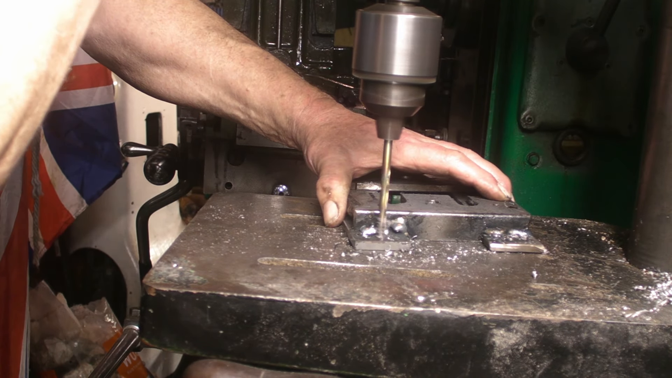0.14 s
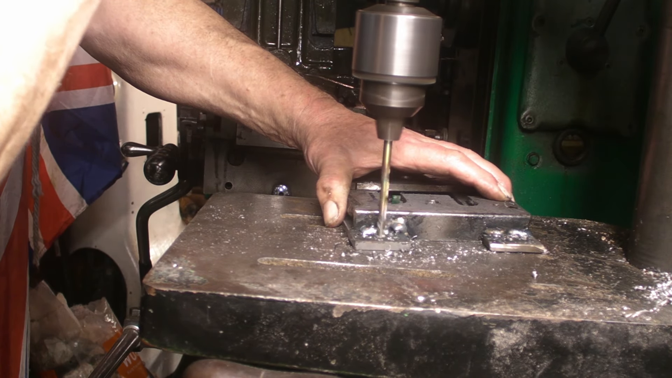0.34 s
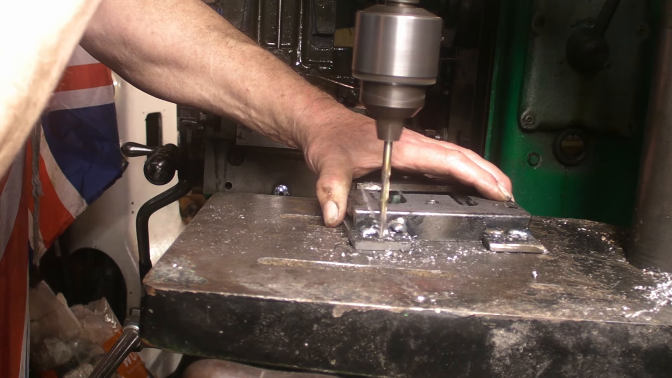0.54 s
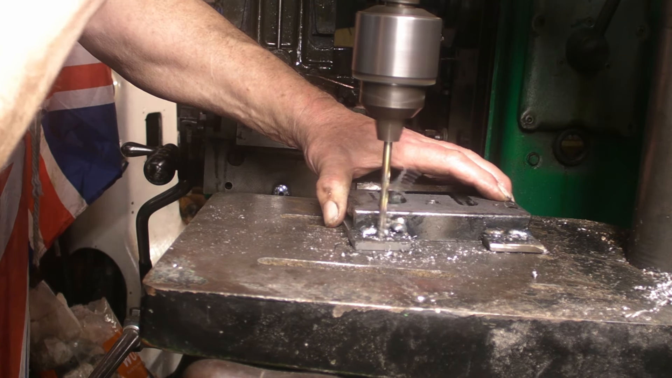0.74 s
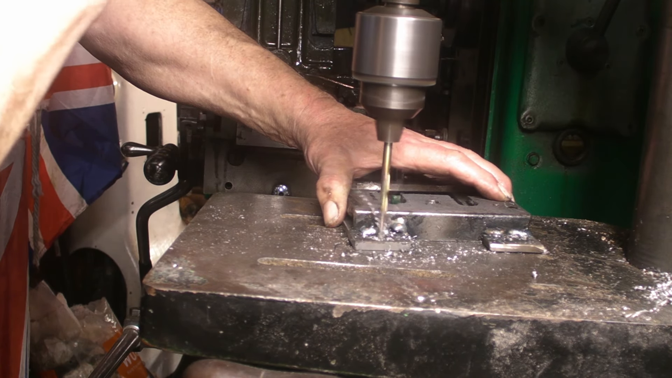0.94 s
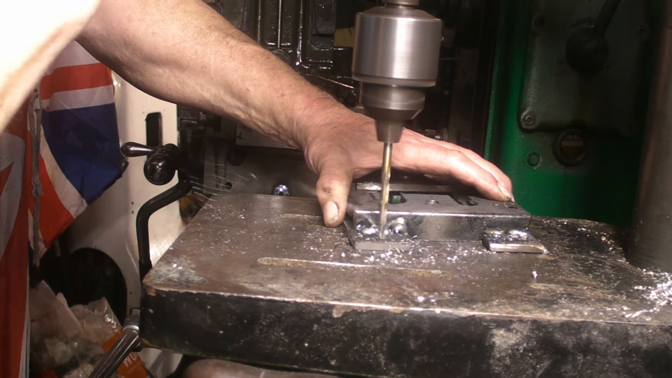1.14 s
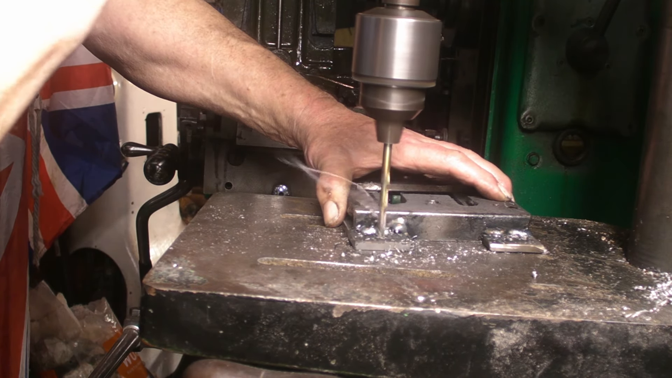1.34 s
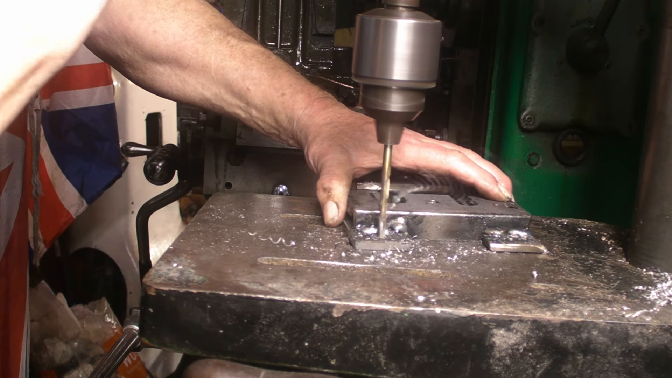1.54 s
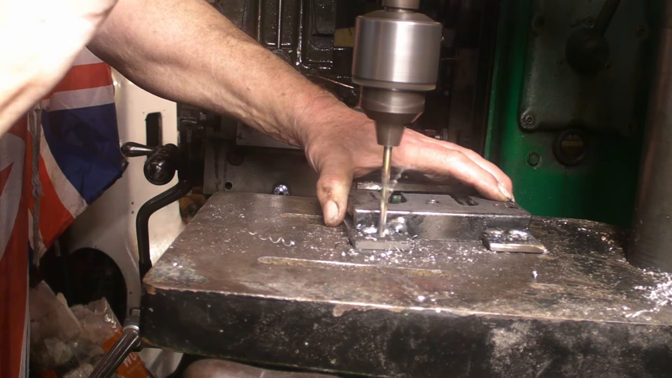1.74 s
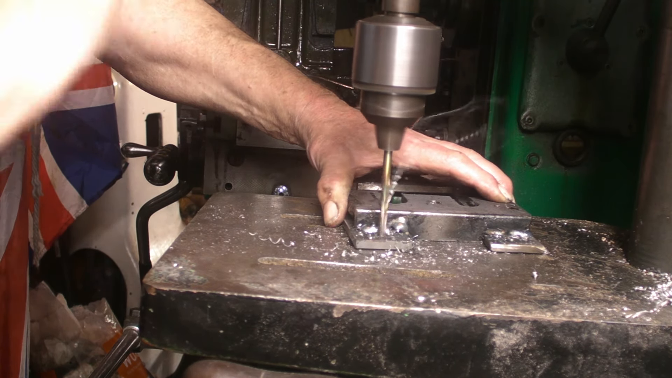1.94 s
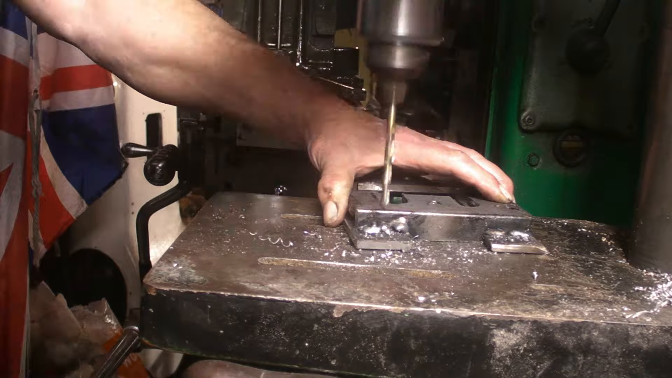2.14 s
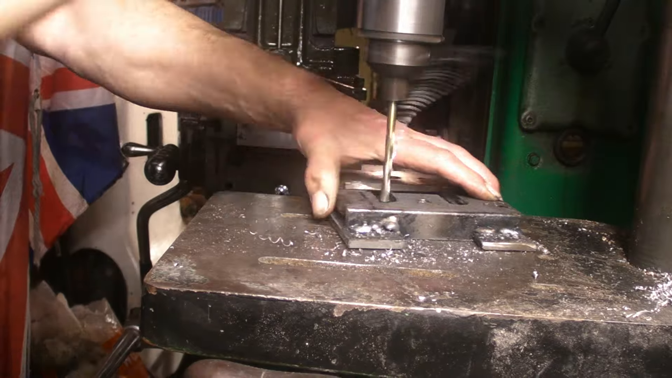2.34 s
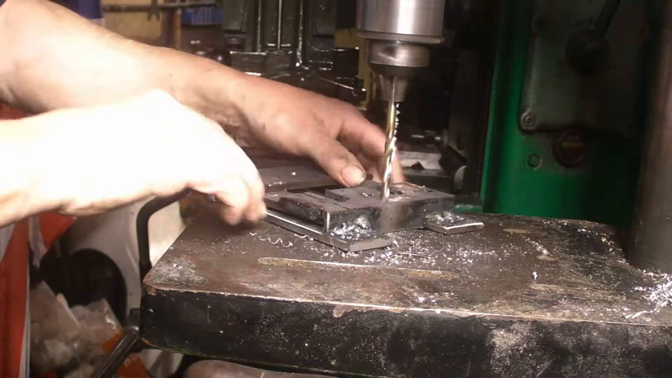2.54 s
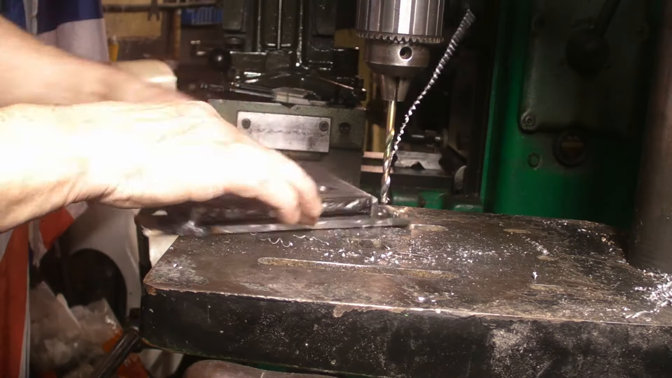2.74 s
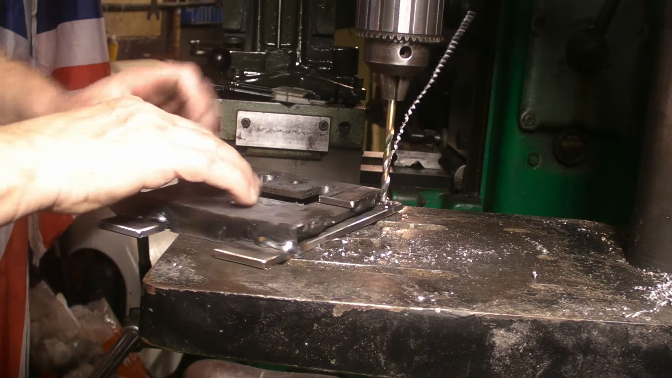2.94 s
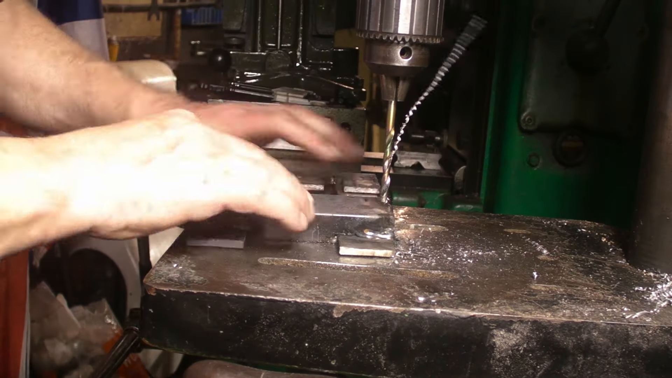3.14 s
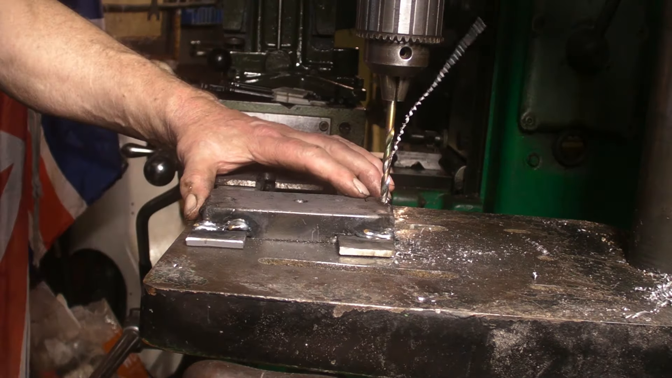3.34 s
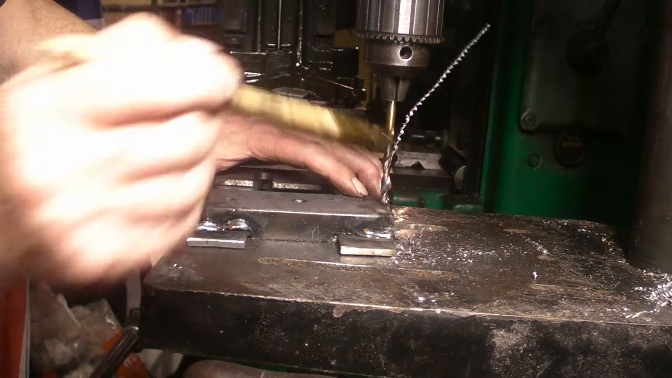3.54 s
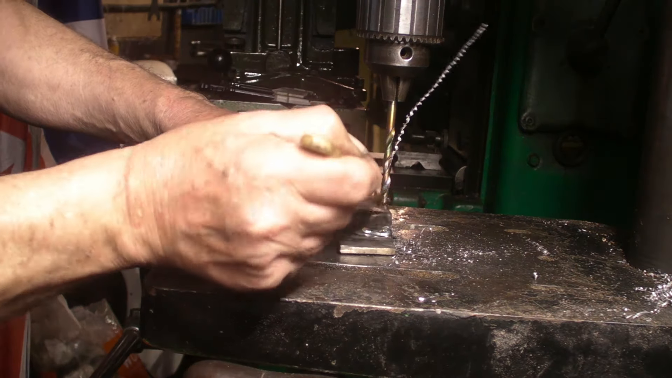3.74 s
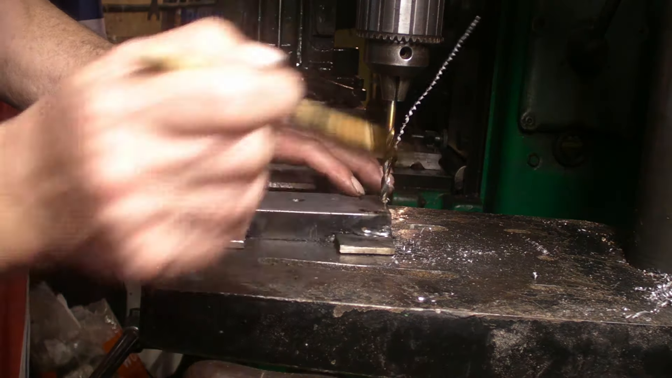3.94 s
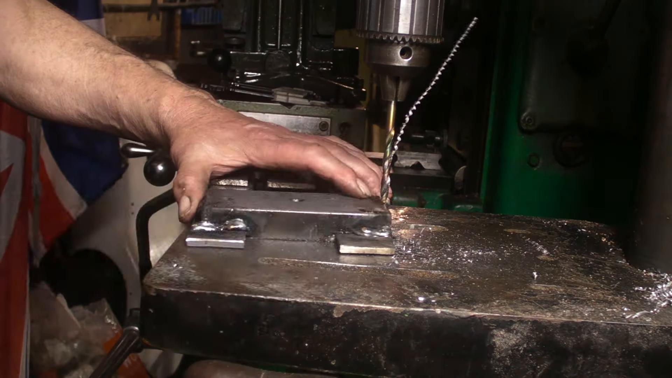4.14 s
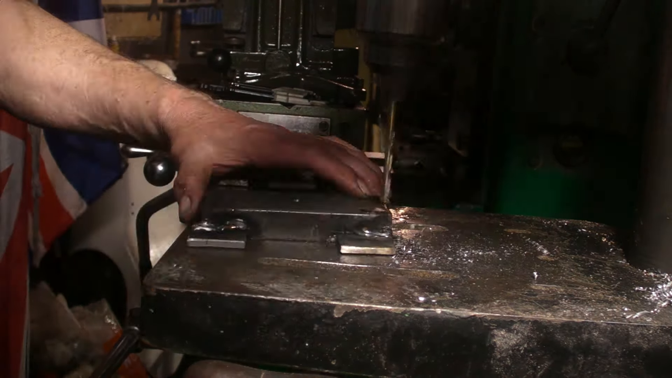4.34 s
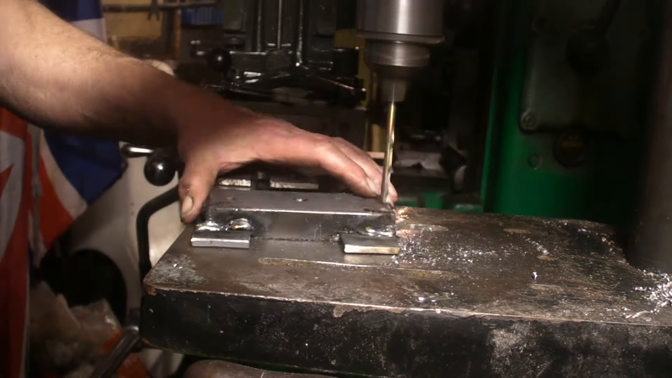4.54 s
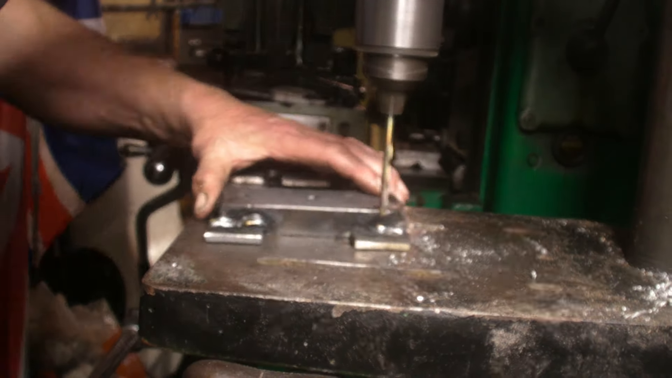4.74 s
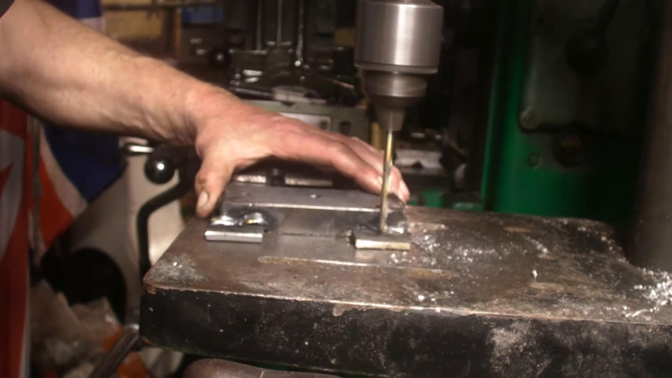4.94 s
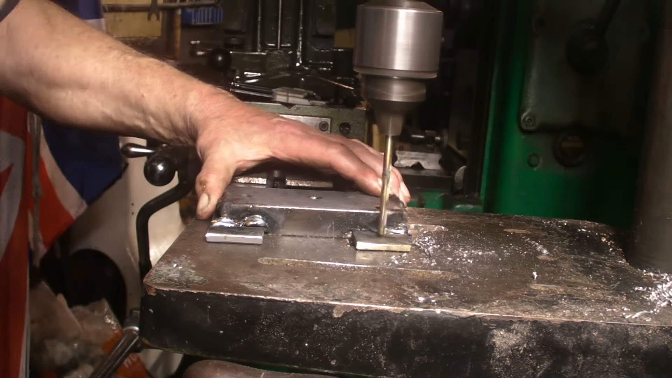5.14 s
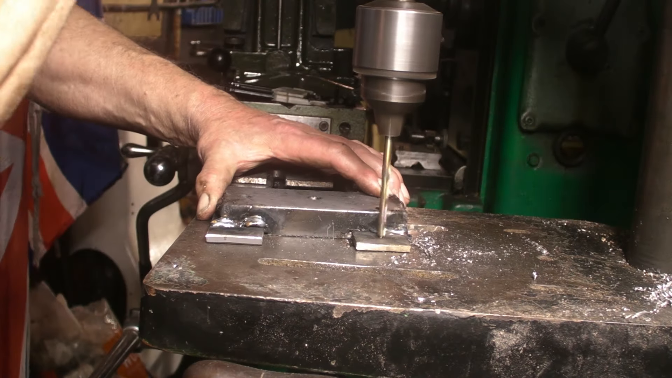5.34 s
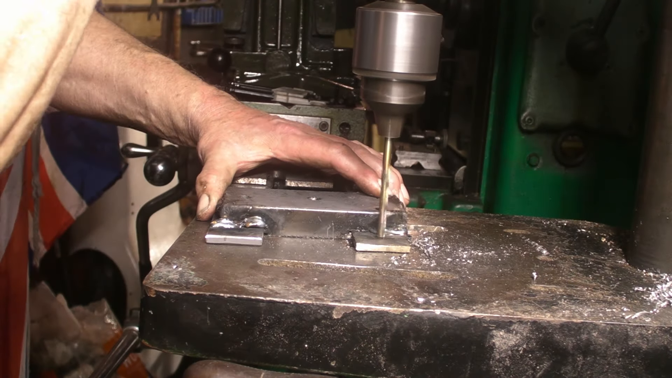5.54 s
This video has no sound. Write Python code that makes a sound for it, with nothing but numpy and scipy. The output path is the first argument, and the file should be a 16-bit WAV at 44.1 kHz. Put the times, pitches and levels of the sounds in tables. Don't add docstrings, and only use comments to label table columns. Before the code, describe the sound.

Close in a small workshop, a pillar drill runs with a bright metallic sizzle, low rumble and coarse steel grinding, its level fluttering. After about two seconds it cuts off. Hands slide and knock a steel plate on the iron table, brushing swarf, then small faint ticks. A sharp switch click, and the motor abruptly resumes its hissing whir. A small camera microphone hears it in stereo, dry, with the treble ending steeply.

```python
import sys
import numpy as np
from scipy import signal
from scipy.fft import rfft, irfft, next_fast_len
from scipy.io import wavfile

SR = 44100
rng = np.random.default_rng(int(sys.argv[2]) if len(sys.argv) > 2 else 0)


def bounce(signal):
    frames = np.transpose(np.atleast_2d(signal))
    limited = np.clip(frames, -1, 1)
    pcm = np.round(limited * 32767).astype(np.int16)
    wavfile.write(sys.argv[1], SR, pcm)


def volts_from_decibels(level):
    exponent = np.asarray(level, float) / 20
    return 10 ** exponent


N = 250488
FFT_SIZE = next_fast_len(N, True)
HZ = np.fft.rfftfreq(FFT_SIZE, 1 / SR) + 1e-3
T = np.arange(N) / SR
PIECE_S = 0.017
STOP_S, START_S = 2.272, 4.378

# frequency in Hz, density in dB per Hz.
SHOP_SPECTRUM = [(18, -37), (30, -3.5), (92, -5), (202, -5), (575, -13), (1360, -18.5), (10700, -21.5),
                 (12600, -22.5), (15500, -28)]
# frequency in Hz, correlation from 0 to 1.
PORT_LIKENESS = [(60, 0.83), (130, 0.89), (290, 0.77), (640, 0.63), (1410, 0.19), (3100, 0.027),
                 (6820, 0.007), (15000, 0.23)]
# frequency in Hz, level difference in dB.
PORT_BALANCE = [(60, -7), (110, 9.5), (200, 3), (380, 3.0), (700, 2.5), (1290, 2.5), (2380, 1.5),
                (4400, 2.5), (8120, 0.5), (15000, -5)]
# frequency in Hz, phase in radians.
PORT_LEAD = [(0, 0), (1030, -0.7), (1550, -0.5), (1980, -1.1), (2670, 0.8), (2930, -1.4), (5080, -4.8),
             (6890, -4.7), (7320, -9.3), (9560, -24.9), (10400, -32.2), (12200, -26.5), (12700, -24.3),
             (15200, -5.5)]

# middle in seconds, length in ms, then plate, thud, scrape
# and swarf levels in dB.
HAND_MOVES = [(2.342, 340, -33.5, -42.0, -42.5, -38), (2.39, 62, -45, -49, -36.0, -29.5),
              (2.416, 56, -36.0, -44, -39, -29.5), (2.444, 48, -26.0, -33.0, -27.0, -26.5),
              (2.53, 116, -34, -43.5, -38.5, -36), (2.645, 67, -27, -50, -41, -40),
              (2.68, 140, -37.5, -46, -46, -43.5), (2.738, 110, -38, -45, -43, -42.0),
              (2.763, 110, -33, -45, -51, -45), (2.795, 36, -28.5, -48.0, -31.5, -32.5),
              (2.826, 66, -35, -43, -60, -48), (2.85, 34, -42, -55, -60, -66),
              (2.882, 90, -36, -40, -48.5, -47), (2.955, 89, -24, -37, -40, -38.5),
              (3.045, 110, -27.5, -46, -42.5, -39.5), (3.151, 92, -25, -38, -36.5, -33.0),
              (3.269, 70, -61, -62, -59, -50.5), (3.482, 39, -49.0, -42, -56, -49),
              (3.54, 59, -62.0, -69, -66, -56), (3.608, 89, -44.5, -69, -53.0, -51.5),
              (3.667, 44, -47, -49, -57, -56.0), (3.687, 34, -47, -62.0, -63.0, -55.0),
              (3.739, 45, -41, -50, -48.5, -47), (3.798, 23, -50, -68, -58, -60.0),
              (3.839, 76, -54, -65, -62.0, -61.0), (3.896, 34, -53.5, -67, -61.0, -58.0),
              (3.956, 28, -46.5, -54, -49.0, -47), (4.136, 98, -62, -62.0, -61, -56),
              (4.317, 60, -56, -60.0, -65, -57)]
# middle in seconds, length in
# ms, then plate, thud, scrape and swarf levels in dB.
MORE_HAND_MOVES = [(2.053, 30, -21.5, -44, -32.5, -42), (2.191, 37, -25, -28.5, -30.5, -60),
                   (2.262, 24, -35, -35, -26, -40), (2.29, 74, -34, -40, -37.5, -34),
                   (2.497, 15, -42, -52, -32, -21.5), (3.424, 34, -57, -48, -62, -47),
                   (4.345, 28, -48, -58, -38, -43), (2.432, 19, -36, -25, -40, -43), (2.365, 24, -35, -45, -35, -34),
                   (2.477, 78, -32, -34.5, -41, -37), (2.589, 46, -49, -56, -46, -35.5),
                   (2.616, 57, -33, -50, -54, -45), (3.161, 9.6, -16.5, -50, -43, -46),
                   (3.205, 96, -66, -59, -72, -63), (3.41, 95, -71, -69, -70, -55), (3.585, 34, -54, -71, -60, -56),
                   (3.765, 36, -47, -47, -63, -53), (4.01, 92, -75, -74, -76, -60.5),
                   (4.388, 36.6, -27.5, -38, -31, -28), (4.46, 110, -51, -43, -39, -32)]
# frequency in Hz, width in Hz, level in dB.
LOOSE_PLATE_MODES = [(567, 66, 1.5), (683, 200, -7), (910, 100, -9.5), (1177, 51, -3), (1350, 78, -2.5),
                     (1499, 87, -8), (1745, 140, -9.5), (2195, 60, -7.5)]
# frequency in Hz, density in dB per Hz.
THUD_SPECTRUM = [(40, -19), (90, -6), (165, -4), (265, 0), (380, -3), (470, -3), (600, -25.5)]
# frequency in Hz, density in dB per Hz.
SCRAPE_SPECTRUM = [(1500, -25), (2300, -9), (3300, -0.5), (4000, 0), (4900, 2.5), (5800, -7), (7000, -60)]
# frequency in Hz, density in dB per Hz.
SWARF_SPECTRUM = [(4500, -17), (5800, -0.5), (7000, -2), (8300, -0.5), (9700, 0.5), (10500, -10.5),
                  (11500, -9), (15300, -26)]

# middle in seconds, length in ms, frequency in Hz, level in dB.
PINGS = [(1.76, 50, 1590, -30.5), (2.052, 49, 1550, -30), (2.19, 26, 1220, -22.5), (2.264, 34, 1460, -16),
         (2.264, 29, 4070, -27), (2.305, 80, 1213, -35), (2.335, 140, 1680, -38), (2.365, 30, 8140, -26),
         (2.39, 40, 2720, -34), (2.405, 60, 1640, -35), (2.415, 30, 4900, -37), (2.445, 22, 7250, -28),
         (2.448, 38, 2680, -29), (2.448, 33, 4800, -34), (2.452, 23, 1550, -23), (2.515, 76, 3400, -37),
         (2.527, 26, 8100, -38), (2.53, 60, 1160, -37), (2.642, 37, 877, -28.5), (2.745, 62, 1347, -36),
         (2.826, 31, 582, -33), (2.85, 33, 576, -32), (2.955, 79, 1387, -28.5), (3.04, 52, 1400, -28.5),
         (3.035, 50, 1676, -30), (3.16, 31, 578, -27), (3.62, 53, 1316, -54), (3.74, 42, 1174, -45),
         (3.05, 77, 659, -31), (3.23, 120, 716, -61), (3.7, 180, 645, -60), (3.798, 26, 640, -45),
         (4.386, 21, 1180, -22), (4.389, 17, 794, -22), (4.522, 84, 1460, -24), (4.564, 19, 1468, -21),
         (4.735, 30, 595, -22), (4.755, 50, 1487, -27), (5.6, 93, 1193, -29)]
# start in seconds, blow in dB, tilt in dB per octave, rattle in dB, rattle length in ms.
CLICKS = [
    (2.4973, -19.5, 5, -30, 9),
    (2.732, -36, -1, -44, 10),
    (3.4245, -40, -5.5, -48, 8.9),
    (3.478, -48, 6, -62, 18),
    (3.723, -49, 3, -48, 16),
    (4.1785, -23.5, 0.7, -27, 18.3),
    (4.339, -46, 5, -44, 51),
]
# frequency in Hz, decay by 60 dB in seconds, level in dB.
SWITCH_MODES = [(533, .03, 0), (800, .01, -5), (1230, .012, -4), (1650, .006, -5), (2160, .006, -1),
                (3080, .005, -4), (4410, .005, -3), (5870, .004, -6), (7300, .004, -7), (8500, .005, -7),
                (9660, .007, -5)]

# time in seconds, then bearing sizzle, casing rumble and cutting levels in dB.
MOTOR_RUNS = [
    [(0.0, -19, -31, -30), (0.18, -23, -33.5, -29), (1.03, -22, -31, -29.5), (1.29, -24, -34, -29),
     (1.47, -22, -27.5, -30), (1.54, -22, -34.5, -28.5), (1.59, -20.5, -29.5, -33),
     (1.64, -24, -34.5, -30.5), (1.9, -20, -31, -34.5), (1.95, -21.5, -40, -31), (1.97, -19, -29.5, -37),
     (2.04, -23.5, -32.5, -35), (2.15, -20.5, -29.5, -35.5), (2.2, -23.5, -37, -31.5),
     (2.22, -18.5, -29, -36.5), (2.26, -23.5, -32, -36), (2.27, -33, -38, -30)],
    [(4.385, -37, -33, -38.5), (4.391, -20, -29, -30), (4.413, -22.5, -33, -49), (4.481, -19, -34.5, -37),
     (4.499, -19.5, -37, -31.5), (4.517, -21, -31.5, -36.5), (4.727, -21, -28.5, -35),
     (4.787, -20, -31.5, -42), (4.881, -20.5, -32, -35.5), (5.509, -20.5, -29.5, -37.5),
     (5.68, -22.5, -33, -32)],
]
# frequency in Hz, level in dB.
HUM_TONES = [(145, -37.5), (295, -41), (404, -37), (700, -32.5), (1800, -42.5), (7170, -38), (9540, -39)]
# frequency in Hz, width in Hz, level in dB.
SPINDLE_MODES = [(6240, 40, -9), (6890, 50, -3), (6975, 40, -5), (7170, 50, -2), (7310, 45, -6),
                 (7490, 60, -4), (8180, 70, -10), (9065, 50, -6), (9550, 100, -1), (9700, 60, -5),
                 (10000, 60, -3), (10355, 90, -2), (12100, 150, -16), (13620, 250, -18), (14550, 200, -22)]
# frequency in Hz, density in dB per Hz.
SIZZLE_SPECTRUM = [(1500, -36), (2500, -19), (3700, -20), (4900, -16), (5900, -14), (7000, -9), (9000, -9),
                   (10400, -9), (11000, -19), (12350, -25), (12600, -44), (12900, -42), (13500, -29),
                   (15000, -33), (15250, -60)]
# frequency in Hz, density in dB per Hz.
CASING_SPECTRUM = [(20, -45), (60, -13.5), (140, -2.5), (220, -4), (330, -6), (420, -5), (700, -4.5),
                   (1000, -6.5), (1500, -4.5), (1900, -8), (2300, -35.5), (4000, -31.5)]
# frequency in Hz, width in Hz, level in dB.
CUT_PLATE_MODES = [(560, 65, 0), (620, 50, -5), (800, 50, -7), (900, 60, -7), (1100, 70, -8),
                   (1362, 50, -4), (1565, 45, -5), (1990, 110, -6), (2070, 60, -7), (2300, 90, -10),
                   (2685, 60, -5), (2838, 50, -3.5), (4800, 90, -13), (5100, 160, -15)]
# frequency in Hz, density in dB per Hz.
GRIND_SPECTRUM = [(250, -36), (450, -10.5), (1000, -8.5), (2000, -13), (3000, -12.5), (3900, -15.5),
                  (5000, -12), (6200, -18)]


def curve(table):
    hz, value = np.transpose(table)
    return np.interp(np.log(HZ), np.log(hz), value)


def colour(table):
    octaves_below = np.maximum(np.log2(table[0][0] / HZ), 0)
    octaves_above = np.maximum(np.log2(HZ / table[-1][0]), 0)
    return volts_from_decibels(curve(table) - 30 * (octaves_below + octaves_above))


def modes(table):
    return np.sqrt(sum(volts_from_decibels(2 * db) / (1 + (2 * (HZ - hz) / width) ** 2) ** 2 for hz, width, db in table))


def band(lo_hz, hi_hz):
    return 1 / np.sqrt((1 + (lo_hz / HZ) ** 6) * (1 + (HZ / hi_hz) ** 6))


def pieces(values, t):
    return np.interp(t, np.arange(len(values)) * PIECE_S, values)


def heard(gain, grit_db=0.0, piece_db=0.0, alike=1.05, lean=1.0):
    grit = volts_from_decibels(grit_db * np.repeat(rng.standard_normal(N // 32 + 1), 32)[:N])
    mid, side = rfft(grit * rng.standard_normal((2, N)), FFT_SIZE) * gain
    likeness = np.clip(alike * np.maximum(curve(PORT_LIKENESS), 0.38), 0, 0.99)
    shared, private = np.sqrt(1 + likeness) * mid, np.sqrt(1 - likeness) * side
    left, right = shared + private, shared - private
    left = left * np.exp(0.8j * np.interp(HZ, *np.transpose(PORT_LEAD)))
    tip = volts_from_decibels(lean * curve(PORT_BALANCE) / 2)
    out = irfft(np.array([left * tip, right / tip]), FFT_SIZE)[:, :N]
    out = out / np.std(out.mean(axis=0))
    return out * volts_from_decibels(piece_db * pieces(rng.standard_normal(1000), T))


def tone(hz, t, slip=np.pi):
    common = np.cumsum(rng.uniform(-slip, slip, 400))
    phases = common + min(hz / 3000, 1.2) * rng.standard_normal((2, 400))
    wave = 2 * np.pi * hz * t
    ports = [pieces(np.cos(phase), t) * np.cos(wave) + pieces(np.sin(phase), t) * np.sin(wave)
             for phase in phases]
    return 1.68 * np.array(ports)


def bump(middle_s, ms):
    half_s = ms / 2000
    at = slice(int((middle_s - half_s) * SR), min(int((middle_s + half_s) * SR), N))
    return at, np.cos(np.pi * (T[at] - middle_s) * 1000 / ms) ** 2


def quiet_shop():
    return volts_from_decibels(-57.5) * heard(colour(SHOP_SPECTRUM), alike=0.3) + volts_from_decibels(-77) * tone(15714, T)


def hands():
    plate_gain = np.hypot(modes(LOOSE_PLATE_MODES), volts_from_decibels(-14) * band(350, 2100))
    bodies = [heard(plate_gain, grit_db=5.0, alike=1.2, lean=0.4),
              heard(colour(THUD_SPECTRUM), lean=0.5),
              heard(colour(SCRAPE_SPECTRUM), grit_db=2.0, lean=0.71),
              heard(colour(SWARF_SPECTRUM), grit_db=2.0, piece_db=3.5)]
    power = np.zeros((4, N))
    for middle_s, ms, *levels_db in list(HAND_MOVES) + list(MORE_HAND_MOVES):
        at, shape = bump(middle_s, ms)
        power[:, at] += volts_from_decibels(2 * np.array(levels_db))[:, None] * shape ** 2
    return sum(body * np.sqrt(p) for body, p in zip(bodies, power))


def pings():
    out = np.zeros((2, N))
    for middle_s, ms, hz, db in PINGS:
        at, shape = bump(middle_s, ms)
        out[:, at] += volts_from_decibels(db - 4.0) * shape * tone(hz, T[at], slip=1.28)
    return out


def clicks():
    out, t = np.zeros((2, N)), T[:1600]
    hz, t60, mode_db = np.transpose(SWITCH_MODES)[:, :, None]
    for start_s, blow_db, tilt_db, rattle_db, ms in CLICKS:
        strength = volts_from_decibels(mode_db + tilt_db * np.log2(hz / 2000))
        decay = np.exp(-np.log(1000) * t / t60)
        rings = strength * decay * np.sin(2 * np.pi * (hz * t + rng.random(hz.shape)))
        body = rings.sum(axis=0)
        body = body / np.abs(body).max()
        fade = np.clip(1 - 1000 * t / ms, 0, 1) ** 2
        echoes = volts_from_decibels(rattle_db) * 0.5 * rng.standard_normal((2, len(t))) * fade
        echoes[0, 4] += volts_from_decibels(blow_db + 12)
        echoes[1, 4] += 0
        echoes[1, 0] += volts_from_decibels(blow_db + 5)
        chop = np.clip(3 - 2500 * t / ms, 0, 1)
        i = int(start_s * SR)
        out[:, i:i + len(t)] += signal.fftconvolve(echoes, body[None])[:, :len(t)] * chop
    return out


def bearings():
    return heard(np.hypot(colour(SIZZLE_SPECTRUM), modes(SPINDLE_MODES)), grit_db=1.0, piece_db=0.6)


def casing():
    return heard(colour(CASING_SPECTRUM), piece_db=2.24)


def bit():
    return heard(np.hypot(colour(GRIND_SPECTRUM), modes(CUT_PLATE_MODES)), grit_db=2.5, piece_db=0.8)


def motor_hum():
    return sum(volts_from_decibels(db) * tone(hz, T) for hz, db in HUM_TONES)


def drill():
    s, *columns = np.transpose(np.vstack(MOTOR_RUNS))
    sizzle_db, rumble_db, cut_db = (np.interp(T, s, column) for column in columns)
    on = np.clip(np.maximum(STOP_S - T, T - START_S) / 0.01 + 0.5, 0, 1)
    bite = np.sqrt(np.maximum(volts_from_decibels(2 * cut_db) - volts_from_decibels(2 * -37.5), 0))
    load = volts_from_decibels(-2.5 * np.clip(bite / volts_from_decibels(-29.5), 0, 1))
    running = volts_from_decibels(sizzle_db - 0.06) * bearings() + volts_from_decibels(rumble_db + 1.0) * casing()
    return on * (running + volts_from_decibels(6.5) * bite * bit() + load * motor_hum())


def scene():
    return quiet_shop() + hands() + pings() + clicks() + drill()


def band_limit(x):
    return signal.sosfilt(signal.butter(12, 15670, fs=SR, output="sos"), x)


def record(dry):
    return band_limit(dry)


dry = scene()
out = record(dry)
bounce(out)
```